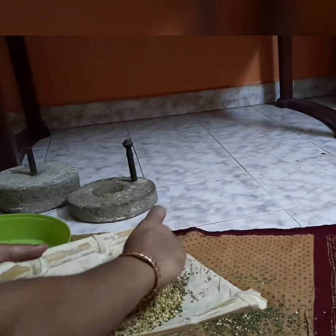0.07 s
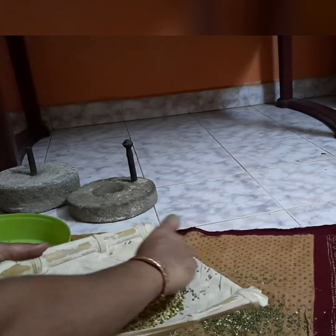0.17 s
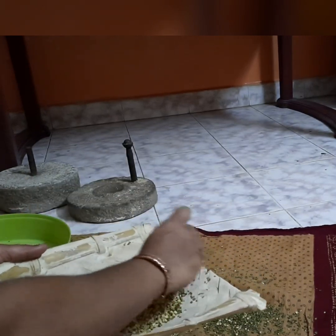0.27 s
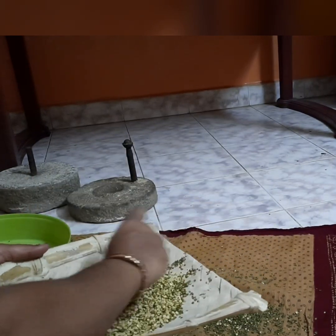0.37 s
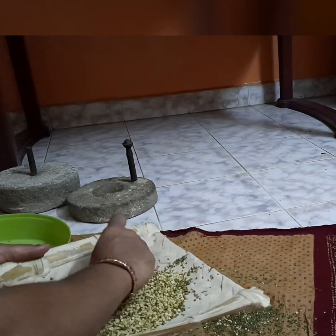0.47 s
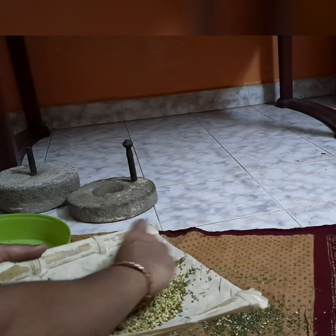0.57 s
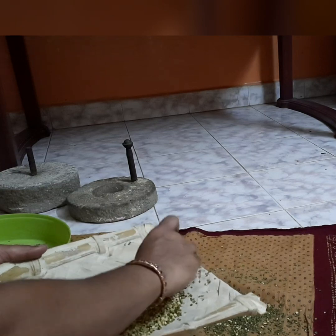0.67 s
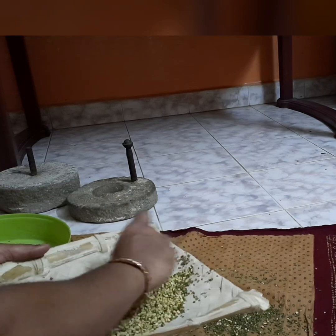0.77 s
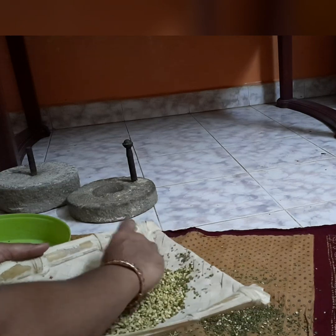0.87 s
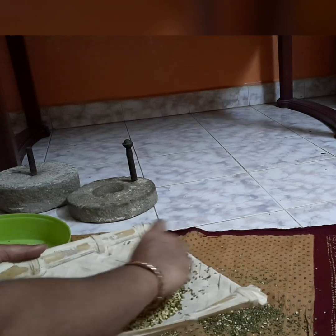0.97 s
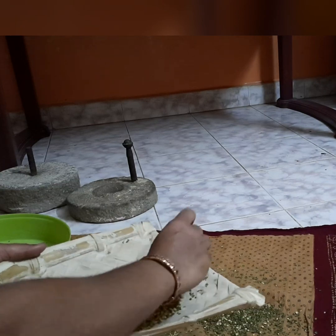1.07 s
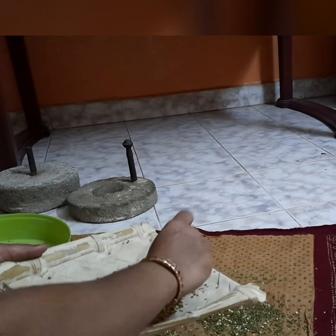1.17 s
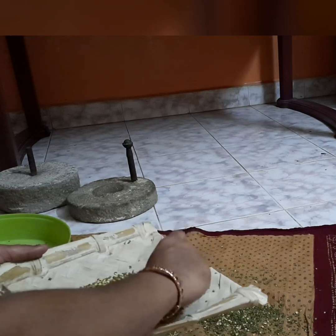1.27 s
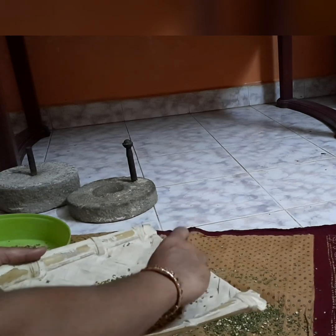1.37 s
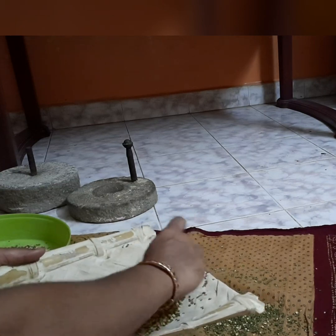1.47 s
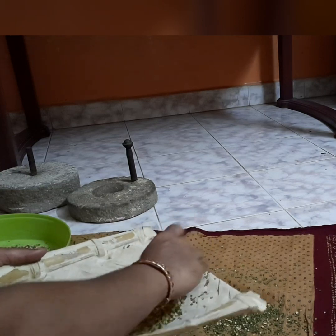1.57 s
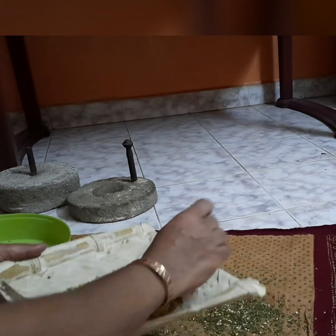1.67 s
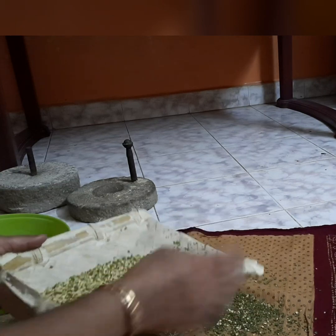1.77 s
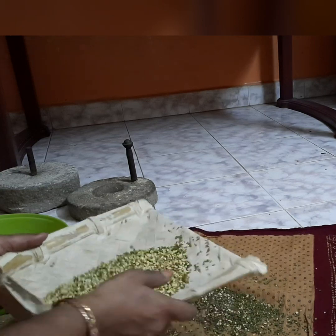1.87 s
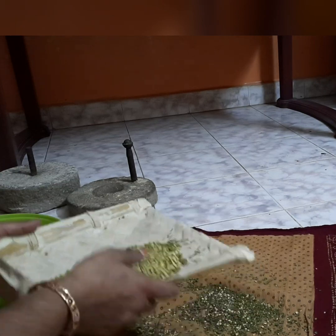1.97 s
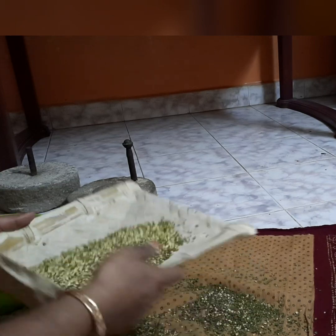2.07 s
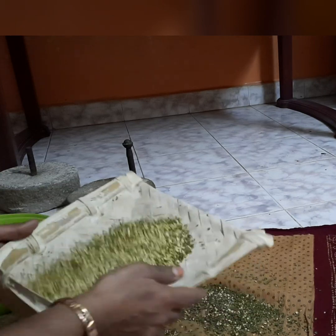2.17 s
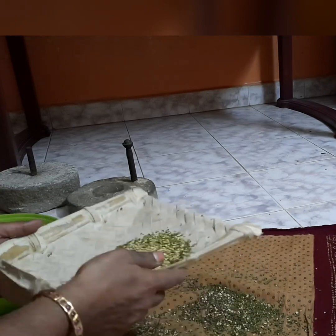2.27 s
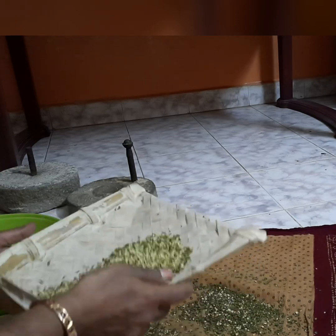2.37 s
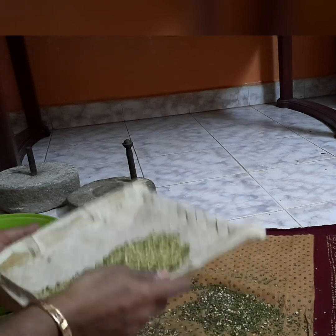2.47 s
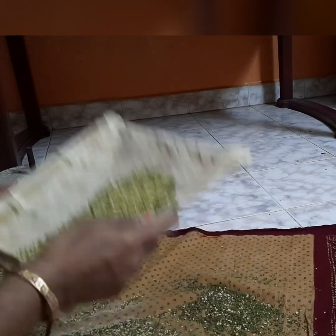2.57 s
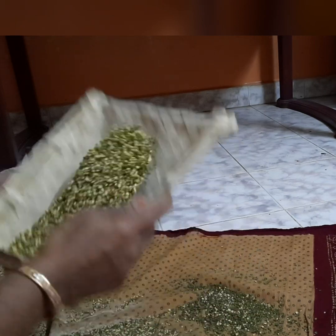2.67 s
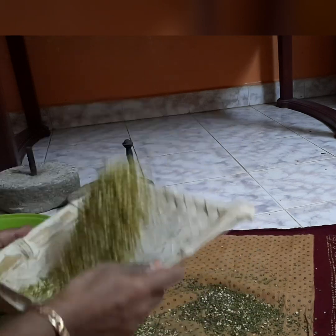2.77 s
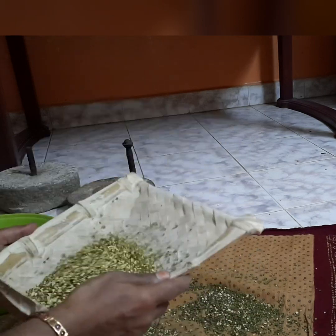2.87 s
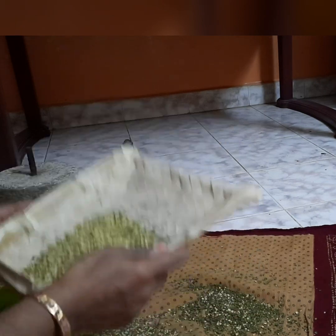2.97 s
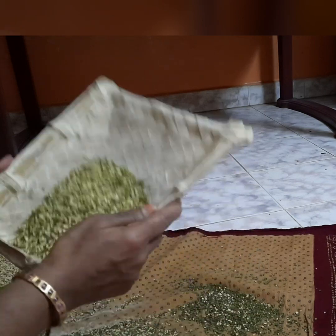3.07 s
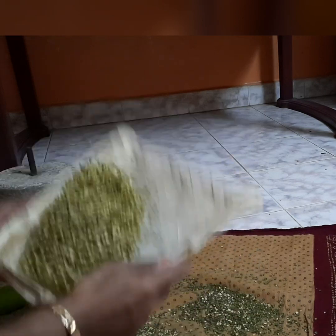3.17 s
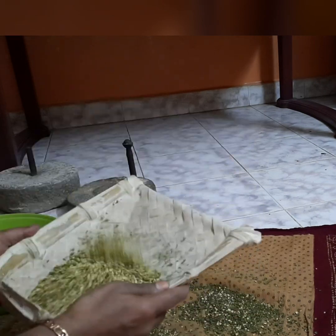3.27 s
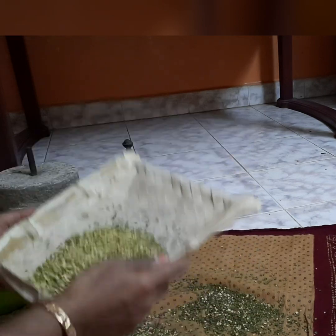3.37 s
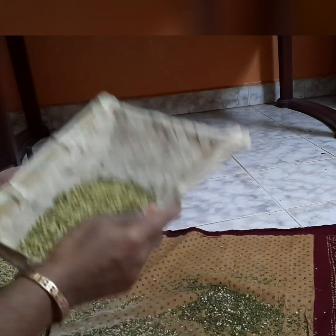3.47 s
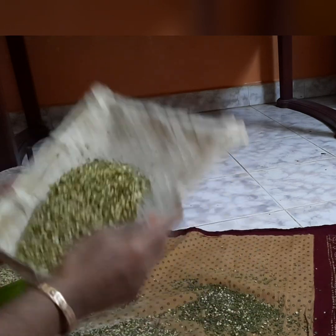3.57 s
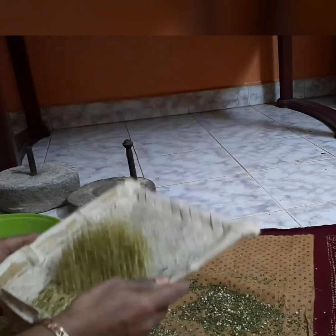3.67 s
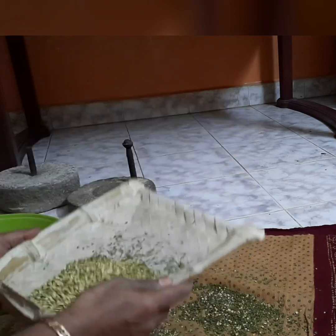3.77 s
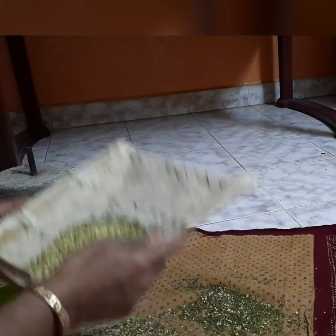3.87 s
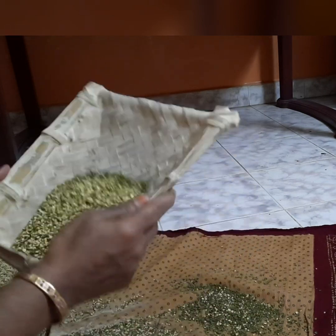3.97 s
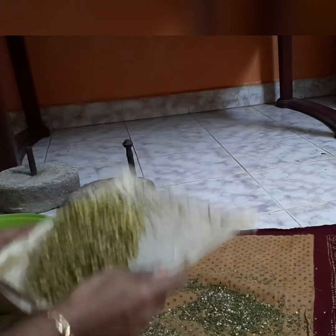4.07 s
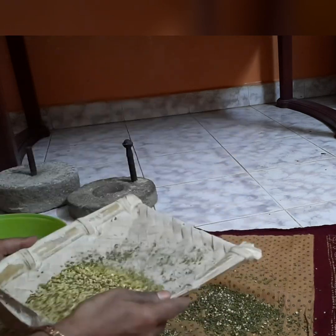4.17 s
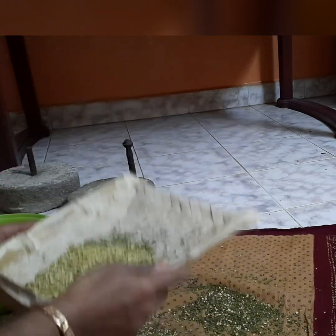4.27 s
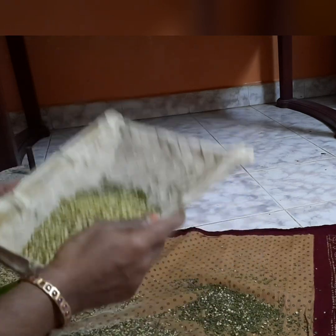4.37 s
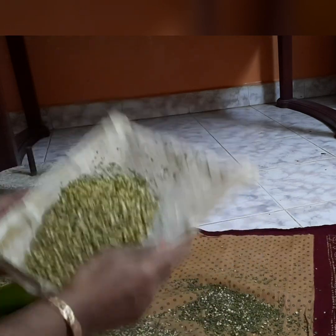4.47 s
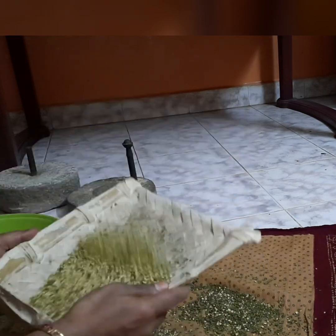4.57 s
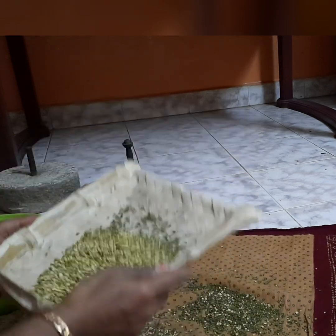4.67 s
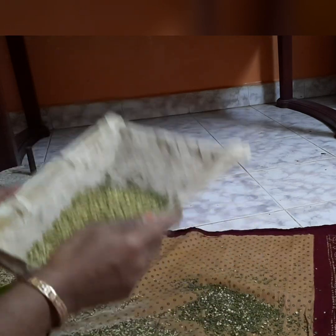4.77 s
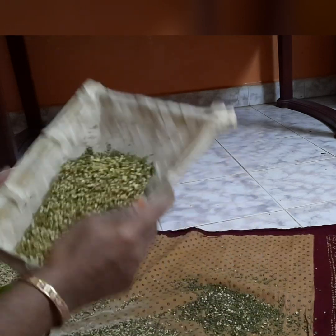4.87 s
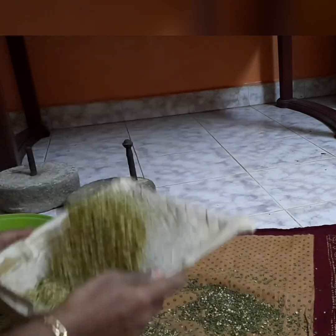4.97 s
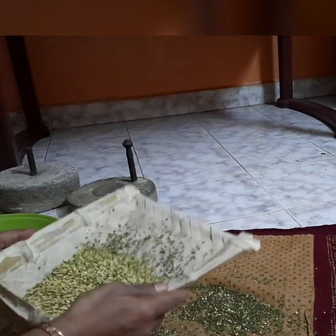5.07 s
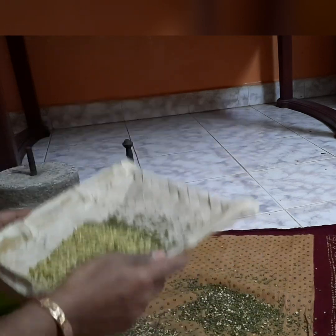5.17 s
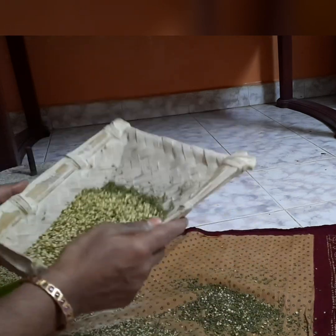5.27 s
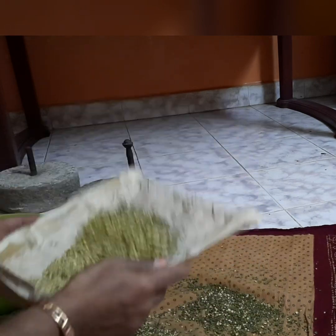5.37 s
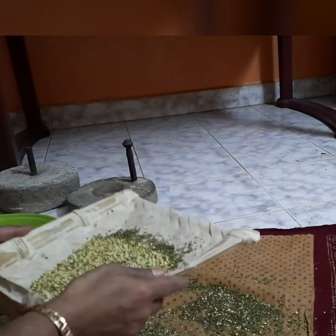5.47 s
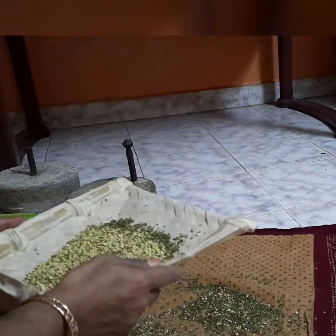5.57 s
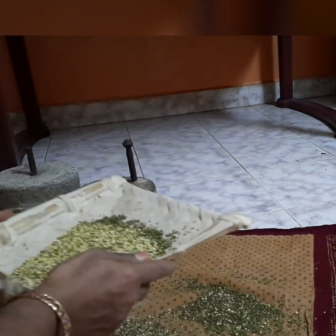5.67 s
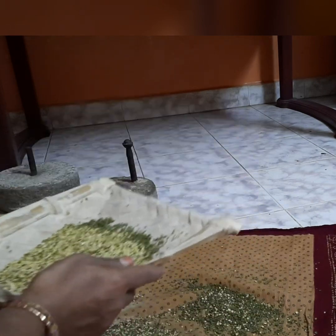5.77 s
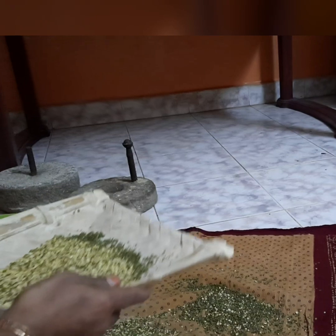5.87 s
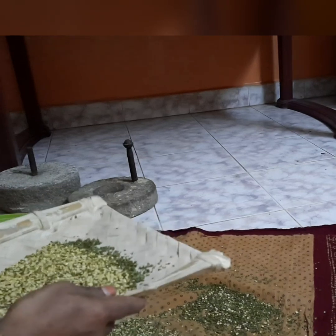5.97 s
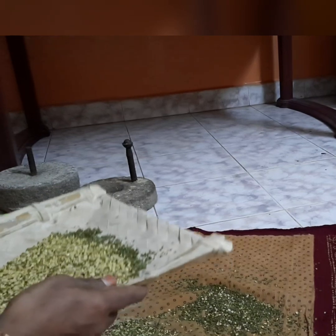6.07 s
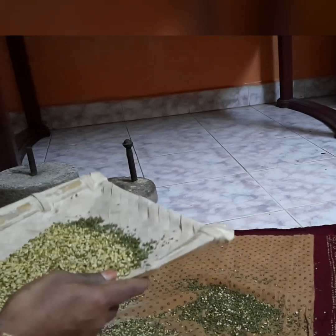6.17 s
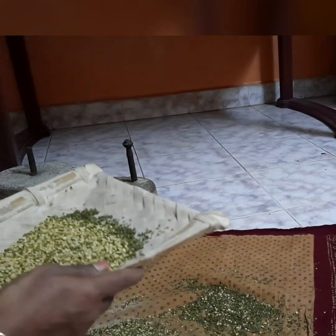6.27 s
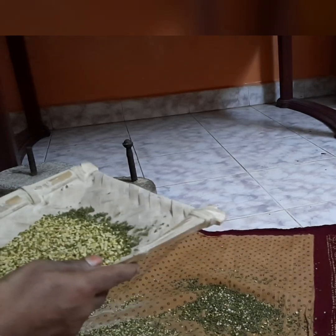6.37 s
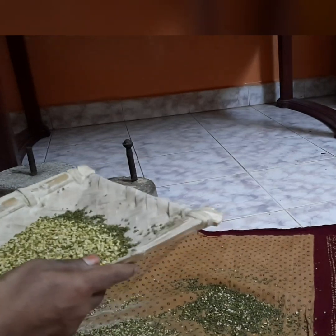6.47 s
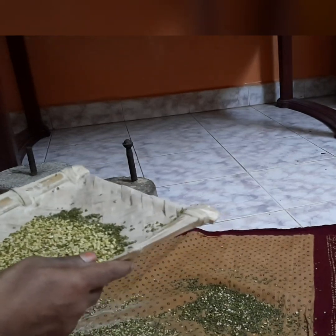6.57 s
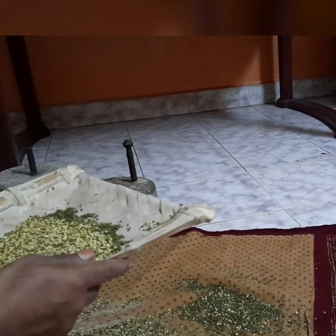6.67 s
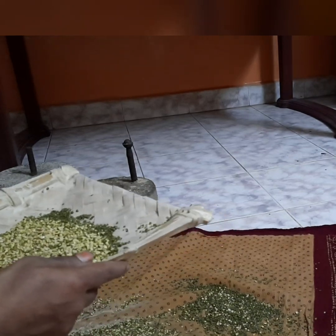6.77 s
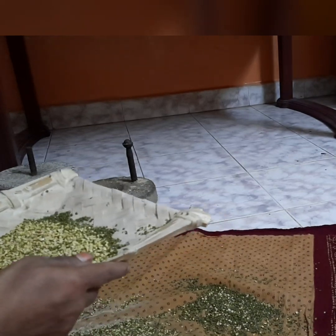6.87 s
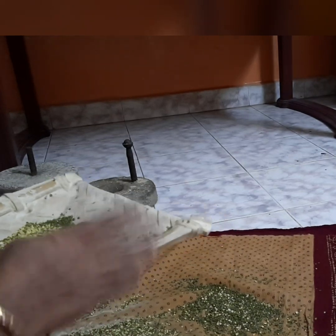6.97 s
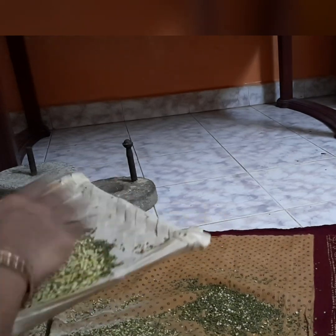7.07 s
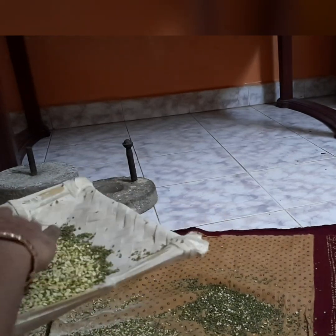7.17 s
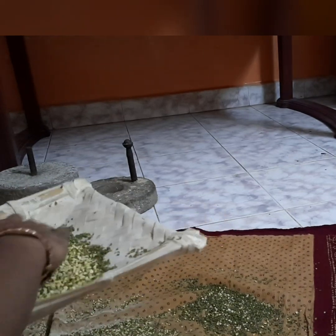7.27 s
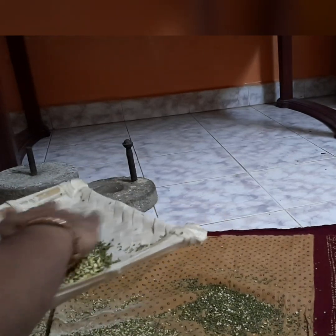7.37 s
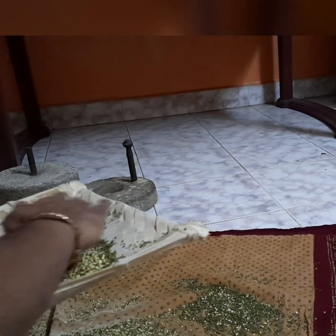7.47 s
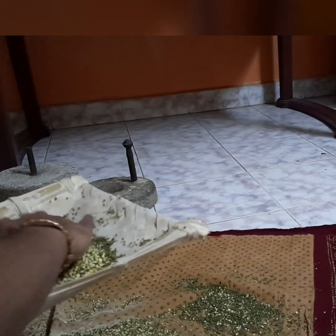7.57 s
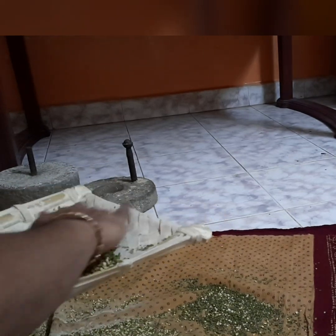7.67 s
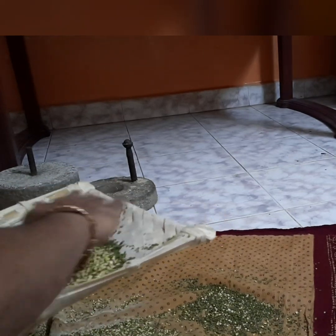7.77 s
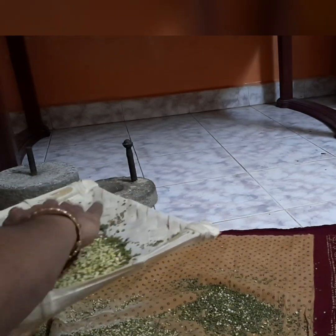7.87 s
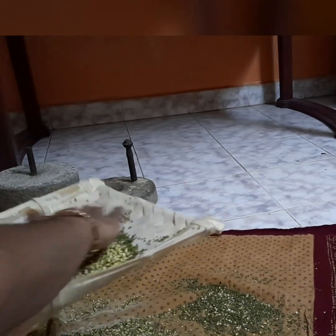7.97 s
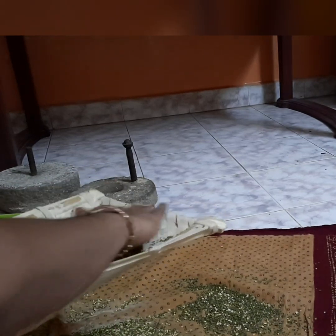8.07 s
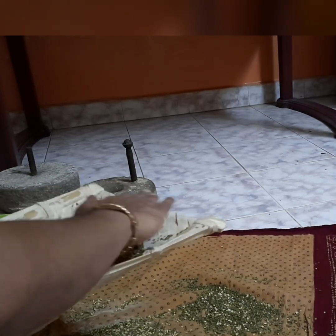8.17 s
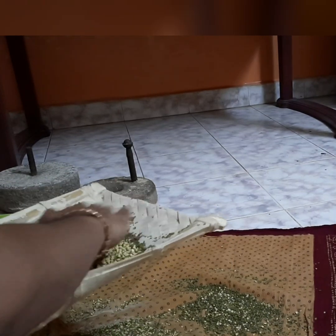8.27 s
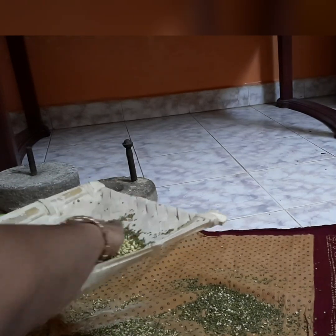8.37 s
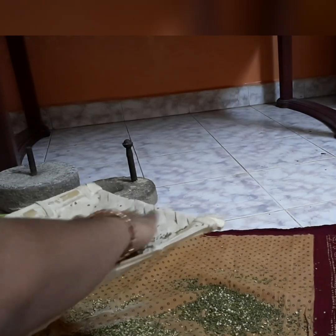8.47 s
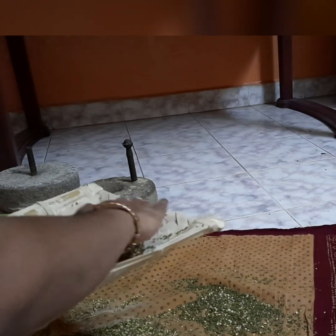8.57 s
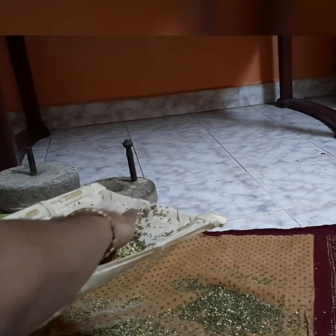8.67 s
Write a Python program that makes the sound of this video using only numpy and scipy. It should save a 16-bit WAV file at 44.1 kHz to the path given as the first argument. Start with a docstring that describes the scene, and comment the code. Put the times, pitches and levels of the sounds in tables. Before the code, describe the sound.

Stereo, about an arm's length from a woven tray: soft gritty finger strokes over grain, a thin metallic bangle shimmer, and short hissing slides. Six evenly spaced showers of grain then crash back onto the tray, crisp and full, with a short bright room tail. The heap slides to rest, nearly quiet over faint house noise, before slower scraping strokes, ticks and dull thuds close.

```python
"""A hand sweeps grain in a woven tray on the floor of a tiled room, with a low house hum of noise behind it.
A bangle rings faintly; then the tray is lifted, the heap slides, is tossed six times and slides to rest.
After a pause the hand sweeps again. Each stroke is a shower of tiny random impacts, coloured as grain on grain,
drumming on the weave and rubbing skins; hand thuds and knots of grain are short noise bursts, the bangle is
three sines. Decaying noise tails and standing waves make the bare walls, heard through two microphone ports."""
import sys
import numpy as np
from scipy import signal
from scipy.fft import rfft, irfft, next_fast_len
from scipy.io import wavfile
from scipy.ndimage import map_coordinates

SR = 44100
rng = np.random.default_rng(int(sys.argv[2]) if len(sys.argv) > 2 else 0)


def materialize(psi):
    """Save the field psi as 16-bit PCM at rate SR to the path in sys.argv[1].

    A 1-D psi becomes a single channel; in a 2-D psi each row is a channel.
    """
    bounded = np.clip(np.atleast_2d(psi).T, -1, 1)
    quanta = np.round(bounded * 32767).astype(np.int16)
    wavfile.write(sys.argv[1], SR, quanta)


N = 384552

# The hand sweeps or stirs the grain.
# Each row: start in seconds, length in seconds, level in dB, rasp of the weave in dB relative to that level.
HAND_SWEEPS = [(0, 0.011, -55.5, -8), (0.203, 0.076, -43, -3), (0.591, 0.1, -44, -2.5),
               (0.978, 0.096, -45, -5.5), (1.35, 0.12, -50, -7), (1.595, 0.031, -57, -13),
               (6.435, .15, -67, -16), (6.974, .035, -67, -5), (7.308, .15, -46, -3),
               (7.632, .1, -43, -3.5), (7.984, .105, -43, -5.5), (8.392, 0.11, -40.5, -0.5)]
# The tossed heap lands. Each row: start in seconds, length in seconds, level in dB.
HEAP_LANDINGS = [(2.827, 0.081, -22), (3.277, 0.065, -22.5), (3.713, 0.07, -23.5), (4.16, 0.066, -23),
                 (4.586, 0.069, -22), (5.026, 0.071, -23)]
# Tone of grain under the hand. Each row: frequency in Hz, relative level in dB.
HUSK_TONE = [(40, -63), (200, -30.5), (600, -3.5), (1000, -12), (1300, -6.5), (1800, 1.5), (2500, -6),
             (3300, -3), (4500, -4), (7000, 0.5), (11000, -0.5), (15500, -0.5)]
# Tone of dry skins rubbing under load. Each row: frequency in Hz, relative level in dB.
FIZZ_TONE = [(500, -66.5), (4000, -20), (8000, -4), (11000, 4), (15500, 0)]


def amp(db):
    """Linear gain of a level in dB."""
    return 10 ** (np.asarray(db) / 20)


def unit(x):
    """x scaled to rms 1."""
    return x / np.sqrt(np.mean(x ** 2) + 1e-20)


def along(points, hz):
    """Read a curve of (Hz, value) points on a log frequency axis."""
    f, v = np.transpose(points)
    return np.interp(np.log(hz + 1), np.log(f + 1), v)


def filtered(x, response):
    """x shaped by a complex response of frequency, with zero padding for the ring-out."""
    n = x.shape[-1]
    padded = next_fast_len(n + SR // 2)
    hz = np.fft.rfftfreq(padded, 1 / SR)
    return irfft(rfft(x, padded) * response(hz), padded)[..., :n]


def coloured(x, tone):
    """x given a tone curve, at rms 1."""
    return unit(filtered(x, lambda hz: amp(along(tone, hz))))


def wobble(rate):
    """A smooth random curve with rate knots a second."""
    knots = rng.standard_normal(int(N * rate / SR) + 4)
    return map_coordinates(knots, [np.arange(N) * rate / SR])


def add(track, s, piece):
    """Mix a piece into the track at s seconds."""
    start = max(round(s * SR), 0)
    part = track[..., start:start + piece.shape[-1]]
    part += piece[..., :part.shape[-1]]


def diffuse(size):
    """Noise from all sides: the two ports share much of the bass and little of the treble."""
    # Each row: frequency in Hz, left-right correlation.
    likeness = [(25, 0.37), (60, 0.94), (130, .88), (300, .8), (640, 0.53), (1400, -0.19), (3000, 0.13),
                (6000, -0.0086)]

    def mid_side(hz):
        turn = np.arccos(np.clip(along(likeness, hz), -1, 1)) / 2
        return np.array([np.cos(turn), np.sin(turn)])

    mid, side = filtered(rng.standard_normal((2, size)), mid_side)
    return np.array([mid + side, mid - side])


def impacts(per_second, scatter_db, clump_db):
    """A shower of tiny impacts of uneven size, swelling in small and large clumps."""
    hit = rng.random(N) < per_second / SR
    clumps = wobble(170) + wobble(45)
    size_db = scatter_db * rng.standard_normal(N) + clump_db * clumps
    return hit * rng.choice([-1, 1], N) * amp(size_db)


def flow(strokes, lead_s, first_db, swell_share, settle_s, trickle_db, press_s, press_db,
         weave_db, fizz_db, weave_grows=0, fizz_grows=0):
    """Envelopes of loose grain, drumming weave and rubbing fizz, the last two following the heap's weight.

    Stray grains lead in, the bulk arrives at first_db, swells for a share of the length, holds, settles and
    trickles on. The weight comes on from press_db over press_s. Weave and fizz levels are relative to the
    loose grain; grows is the further dB per dB of stroke level, taken below the loudest stroke.
    """
    trickle_t60_s = 1.6
    t = np.arange(SR) / SR - lead_s
    contact = np.zeros((3, N))
    starts, lengths, levels_db = np.transpose(strokes)
    effort_db = levels_db - levels_db.max()
    weaves = amp(weave_db + weave_grows * effort_db)
    fizzes = amp(fizz_db + fizz_grows * effort_db)
    for s, length, db, weave, fizz in zip(starts, lengths, levels_db, weaves, fizzes):
        rise_db = np.interp(t, [-lead_s, 0, swell_share * length], [-60, first_db, 0])
        after = np.maximum(t - length, 0)
        settle_db = -60 * after / settle_s
        stragglers_db = trickle_db - 60 * after / trickle_t60_s
        stroke = amp(db + rise_db + np.maximum(settle_db, stragglers_db))
        loaded = stroke * amp(np.interp(t, [0, press_s], [press_db, 0]))
        kinds = np.array([stroke, weave * loaded, fizz * loaded])
        add(contact, s - lead_s, kinds[:, t + s >= 0])  # drop any lead-in before time zero
    return contact


def bursts(rows):
    """Envelope of sudden blows (s, dB, t60 s), each with a 2 ms attack and an exponential decay."""
    t = np.arange(SR) / SR
    envelope = np.zeros(N)
    for s, db, t60 in rows:
        add(envelope, s, amp(db - 60 * t / t60) * np.minimum(t / .002, 1))
    return envelope


def ambience(drift_db=0.54):
    """The low background noise of the house: diffuse coloured noise, drifting a little in level."""
    # Each row: frequency in Hz, relative level in dB.
    house_tone = [(15, -44.5), (30, -23.5), (50, -12.5), (90, -9.5), (114, 1.5), (165, -6.5), (210, 0),
                  (320, -3.5), (440, 3), (620, -6), (1000, -8.5), (1600, -10), (3600, -25.5), (6600, -30.5),
                  (8000, -23), (9400, -36), (15500, -38)]
    # Each row: time in seconds, level in dB before the drift.
    house_level = [(0, -60), (2.7, -56.5), (5.8, -59.5), (6.5, -62), (7.15, -59.5)]
    level_db = np.interp(np.arange(N) / SR, *np.transpose(house_level)) + drift_db * wobble(5.6)
    return amp(level_db) * coloured(diffuse(N), house_tone)


def sweeps():
    """Fingers drag grain across the ribs of the weave: loose scrape, rasp of the ribs and rubbing fizz."""
    # Grain pressed over the weave. Each row: frequency in Hz, relative level in dB.
    rib_tone = [(30, -60), (100, -16), (220, -14), (330, -8), (550, -2), (900, -1.5), (1250, -2),
                (1800, -0.5), (2500, -6.5), (4000, -11.5), (15500, -37)]
    rows = np.array(HAND_SWEEPS)
    loose, heavy, rubbing = flow(
        rows[:, :-1], lead_s=0.052, first_db=-4.5, swell_share=0.48, settle_s=0.054, trickle_db=-34,
        press_s=0.029, press_db=0,  # at 0 dB the hand bears fully from the start
        weave_db=rows[:, -1], fizz_db=-3.5, fizz_grows=0.31)
    scrape = coloured(impacts(per_second=5000, scatter_db=3, clump_db=1.4), HUSK_TONE)
    rasp = coloured(impacts(per_second=1400, scatter_db=2.5, clump_db=1.6), rib_tone)
    fizz = coloured(impacts(per_second=9000, scatter_db=3, clump_db=1.2), FIZZ_TONE)
    return loose * scrape + heavy * rasp + rubbing * fizz


def bumps():
    """The soft heel of the hand leans late in every sweep and at times knocks; the light weave has little bass."""
    # Hand on the tray. Each row: frequency in Hz, relative level in dB.
    thud_tone = [(25, -60), (70, -36), (130, -24.5), (200, -7), (300, -7), (450, 1.5), (600, 4),
                 (850, -5.5), (1400, -17), (3000, -19), (10000, -42)]
    # The hand knocks the tray. Each row: start in seconds, level in dB.
    hand_knocks = [(1.075, -43), (7.44, -38.5), (7.712, -46.5), (8.424, -29), (8.477, -34)]
    lean_share, lean_db, lean_t60_s = .85, -6.5, 0.12  # place within the sweep; level relative to it
    knock_t60_s = 0.076
    leans = [(s + lean_share * length, db + lean_db, lean_t60_s) for s, length, db, _ in HAND_SWEEPS]
    knocks = [(s, db, knock_t60_s) for s, db in hand_knocks]

    def body(hz):
        return amp(along(thud_tone, hz))

    thuds = filtered(bursts(leans + knocks) * rng.standard_normal(N), body)
    body_power = np.mean(body(np.linspace(0, SR / 2, SR)) ** 2)
    return thuds / np.sqrt(body_power)


def ticks(t60=.052):
    """A knot of grain strikes at once as a short, sharp noise burst; one opens every landing."""
    # Each row: start in seconds, level in dB.
    grain_knots = [(0.2, -36.5), (1.621, -43.5), (4.234, -27), (5.472, -22), (7.308, -38), (7.345, -34),
                   (7.443, -32.5), (8.035, -25)]
    front_db = -9.5  # relative to the landing
    fronts = [(s, db + front_db) for s, _, db in HEAP_LANDINGS]
    strikes = [(s, db, t60) for s, db in [*fronts, *grain_knots]]
    return bursts(strikes) * coloured(rng.standard_normal(N), HUSK_TONE)


def bangle(t60=0.93):
    """A metal bangle is brushed; its sine partials waver in pitch and flutter in level as the wrist moves."""
    # Partials of the ring. Each row: frequency in Hz, relative level in dB.
    ring_partials = [(3112, -19), (3535, -3), (3972, -9.5)]
    # Each row: start in seconds, level in dB.
    touches = [(1.336, -59.5), (1.39, -53.5), (1.46, -60.5)]
    t = np.arange(N) / SR

    def partial(hz):
        flutter = amp(2 * wobble(35))
        cycles = hz * t + .25 * wobble(50)
        return flutter * np.sin(2 * np.pi * cycles)

    ring = sum(amp(db) * partial(hz) for hz, db in ring_partials)
    return bursts([(s, db, t60) for s, db in touches]) * unit(ring)


def tosses():
    """The heap slides, or rains back on itself, and drums on the tray: patter, drum and rubbing fizz."""
    # The heap slides over the weave as the tray is jogged.
    # Each row: start in seconds, length in seconds, level in dB.
    heap_slides = [(1.908, 0.058, -39), (2.1, .074, -30), (2.21, 0.066, -28), (2.365, 0.021, -39.5),
                   (5.406, .058, -24.5)]
    # Grain on grain. Each row: frequency in Hz, relative level in dB.
    grain_tone = [(40, -65), (200, -41.5), (500, -24), (1200, -2), (2200, 0.5), (3200, 0), (5000, 1),
                  (8000, -0.5), (11000, -7), (15500, -9.5)]
    # Grain on the tray. Each row: frequency in Hz, relative level in dB.
    weave_tone = [(30, -58.5), (80, -27.5), (200, -17), (270, -17.5), (400, -1), (600, 2.5), (830, 0.5),
                  (980, -1), (1250, 3), (2200, 3), (4000, -5), (9000, -24.5), (15500, -32.5)]
    landing = flow(
        HEAP_LANDINGS, lead_s=.05, first_db=-3, swell_share=0.51, settle_s=.23, trickle_db=-48.5,
        press_s=0.028, press_db=-9.5, weave_db=-5.5, fizz_db=-1.5)
    sliding = flow(
        heap_slides, lead_s=.075, first_db=-12, swell_share=0.66, settle_s=0.2, trickle_db=-44.5,
        press_s=0.035, press_db=-4, weave_db=-7.5, fizz_db=-3, weave_grows=-0.66, fizz_grows=.35)
    loose, heavy, rubbing = landing + sliding
    patter = coloured(impacts(per_second=7000, scatter_db=3, clump_db=1.1), grain_tone)
    drum = coloured(impacts(per_second=3000, scatter_db=3, clump_db=1.2), weave_tone)
    fizz = coloured(impacts(per_second=9000, scatter_db=3, clump_db=1.1), FIZZ_TONE)
    return loose * patter + heavy * drum + rubbing * fizz


def tail():
    """The walls' answer to one spot: diffuse noise in which each frequency dies at its own speed."""
    # Each row: frequency in Hz, time to fall 60 dB in seconds.
    decay_times = [(150, 1), (530, 0.58), (1400, 0.58), (3700, 0.49), (8000, 0.5), (15000, 0.37)]
    hz, t, noise = signal.stft(diffuse(SR), SR, nperseg=256)
    decay = amp(-60 * t / along(decay_times, hz)[:, None])
    answer = signal.istft(noise * decay, SR, nperseg=256)[1]
    return answer / np.linalg.norm(answer[0])


def room(x, direct_db, wet_db, lag_ms, count=6):
    """Contacts wander over the tray, each spot with its own tail; the direct sound reaches the left port first."""
    # Room modes. Each row: centre in Hz, width in Hz, peak level in dB relative to the plain tail.
    modes = [(447, 3.5, 0.5), (453, 7.6, -4), (536, 22, 2), (612.4, 11, 1.5), (735, 3, 2), (843, 12, 1),
             (1250, 6.1, -10.5)]
    spots = np.array([wobble(70) for _ in range(count)])
    shares = spots / np.linalg.norm(spots, axis=0)  # total power stays constant
    wet = sum(signal.oaconvolve((share * x)[None], tail(), axes=1)[:, :N] for share in shares)

    def standing_waves(f):
        return 1 + sum(amp(db) * 1j * f * w / (c * c - f * f + 1j * f * w) for c, w, db in modes)

    wet = filtered(wet, standing_waves)
    late = filtered(x, lambda hz: np.exp(-2j * np.pi * hz * lag_ms / 1000))
    return amp(direct_db) * np.array([x, late]) + amp(wet_db) * wet


def scene():
    """Everything sounds from the tray, about an arm's length away in a live room, over the house noise."""
    tray = sweeps() + bumps() + ticks() + bangle() + tosses()
    return ambience() + room(tray, direct_db=-3.5, wet_db=-0.5, lag_ms=0.14)


def record(dry):
    """Each microphone port colours the sound with its cavity resonance; a steep band limit cuts the top."""
    # Each row: frequency in Hz, gain in dB.
    left_port = [(300, 1), (2000, -0.5), (4800, 0), (6500, 0.5), (7500, 6.5), (8200, 8.5), (9000, -5),
                 (10600, -11), (12500, -6), (15500, -7)]
    # Each row: frequency in Hz, gain in dB.
    right_port = [(300, -1.5), (2000, -3.5), (5000, -3.5), (6700, -6), (7300, -6.5), (8000, 1), (9300, -2),
                  (12200, -1.5), (15500, -5)]
    top_hz = 15850

    def ports(hz):
        band = np.clip((top_hz - hz) / 200 + .5, 0, 1)  # fades out over 200 Hz
        return amp([along(left_port, hz), along(right_port, hz)]) * band

    return filtered(dry, ports)


dry = scene()
out = record(dry)
materialize(out)
```